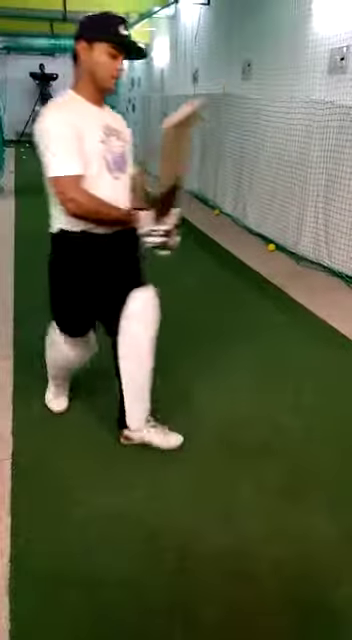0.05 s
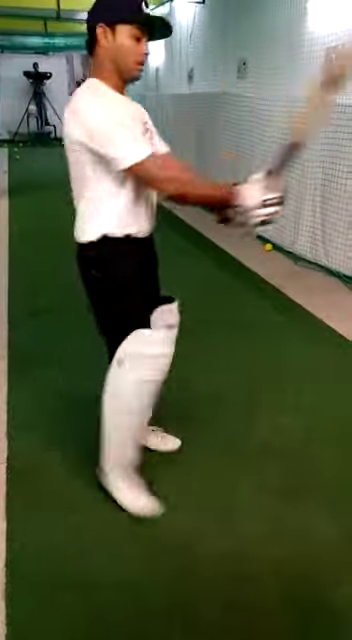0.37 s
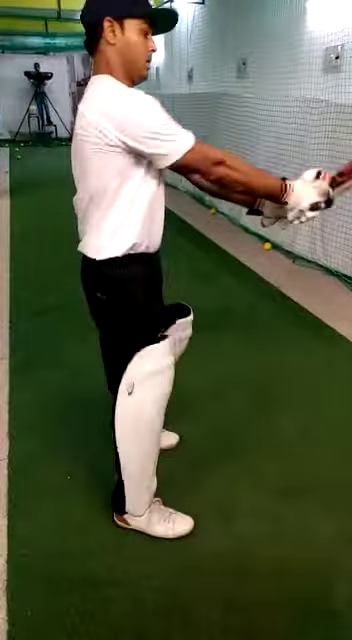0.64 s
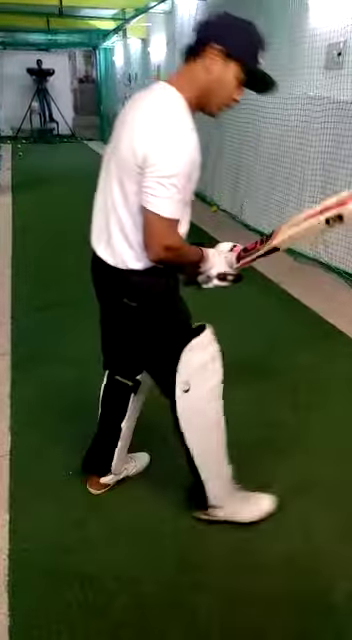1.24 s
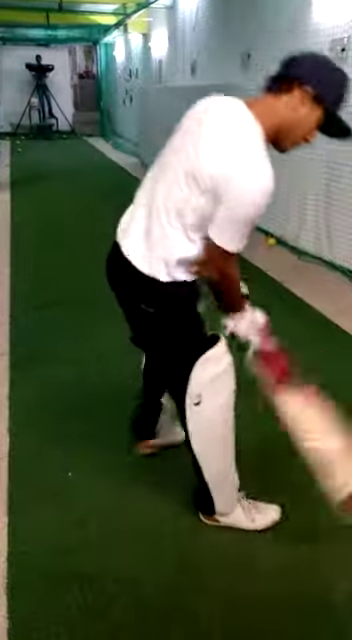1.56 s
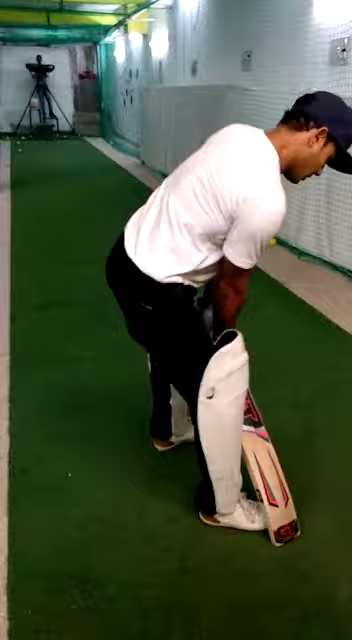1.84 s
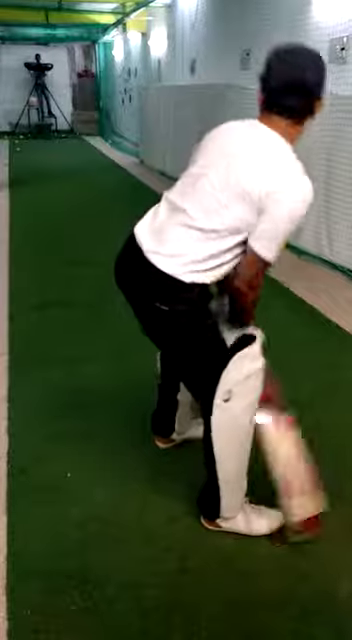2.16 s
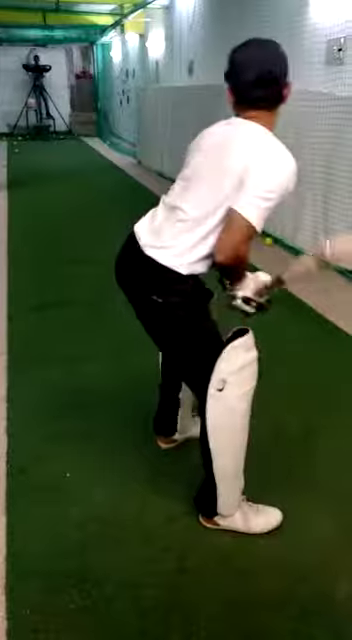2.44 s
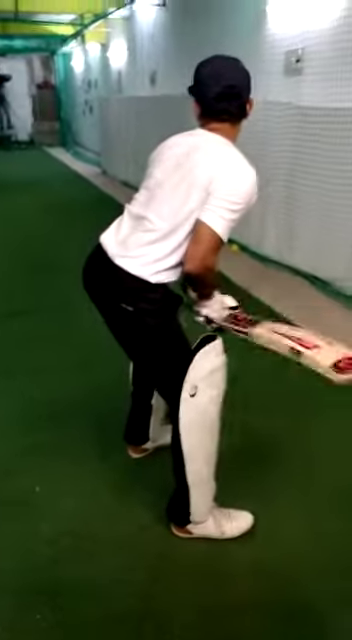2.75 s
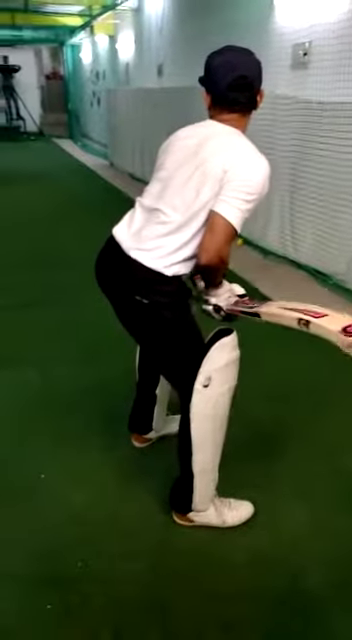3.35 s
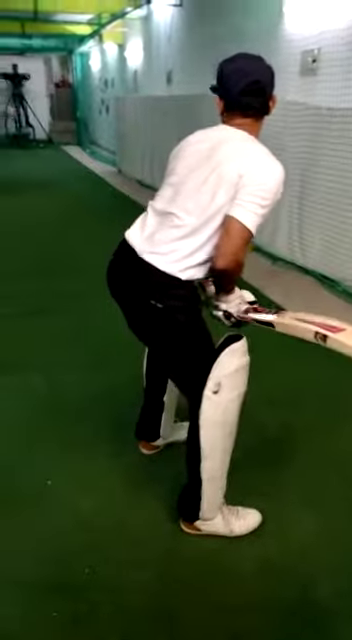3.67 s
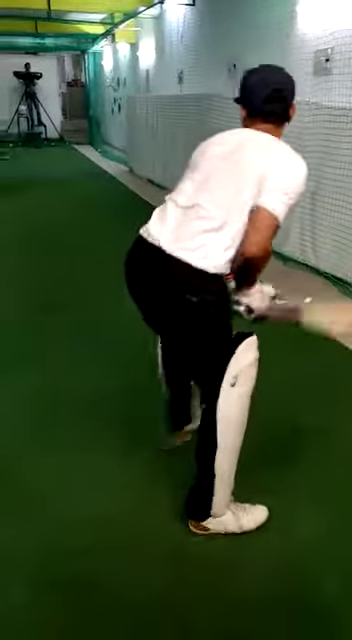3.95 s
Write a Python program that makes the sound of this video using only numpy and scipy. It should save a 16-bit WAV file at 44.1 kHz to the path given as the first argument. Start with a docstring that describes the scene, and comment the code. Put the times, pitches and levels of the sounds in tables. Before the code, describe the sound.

A fan hums steadily in an indoor cricket net, with faint shoe and pad scuffs during the first two seconds. At about 1.8 seconds a bat taps the turf with a woody, echoing thud. From 3.2 seconds a ball knocks and rolls down a distant bowling machine's chute. At 3.7 it fires with a brief squeal and a loud crack, followed by metallic rattling and a hollow boom.

```python
"""Indoor cricket net. A fan hums, shoes and pads scuff, and a faint squeak passes early on.
The batsman taps his bat: turf crunches, willow rings, the walls echo.
Far down the hall a ball knocks and rolls along a bowling machine's chute and squeals at the wheels.
They fire it with a bright crack; the machine rattles and rings, and a hollow boom fills the room."""
import sys
import numpy as np
from scipy import signal
from scipy.fft import rfft, irfft
from scipy.io import wavfile

SR = 44100
rng = np.random.default_rng(int(sys.argv[2]) if len(sys.argv) > 2 else 0)


def file_out(sig):
    """Save sig as 16-bit WAV at sys.argv[1]."""
    # one column per channel
    cols = np.atleast_2d(sig).T
    # limit, then scale
    lim = np.clip(cols, -1, 1)
    pcm = np.round(lim * 32767).astype(np.int16)
    wavfile.write(sys.argv[1], SR, pcm)


N = 176400
TIME = np.arange(N) / SR
FREQS = np.fft.rfftfreq(N, 1 / SR)
BAND_LIMIT_HZ = 15780


def amp(db):
    """Decibels to gain."""
    return 10 ** (np.asarray(db) / 20)


def lookup(table, hz, column=1):
    """Table column interpolated over log frequency."""
    columns = np.transpose(table)
    return np.interp(np.log(hz + 1), np.log(columns[0] + 1), columns[column])


def delayed(seconds):
    """Spectrum of a pure delay."""
    return np.exp(-2j * np.pi * FREQS * seconds)


def swell(middle, width):
    """Gaussian rise and fall; width is one sigma."""
    return np.exp(-.5 * ((TIME - middle) / width) ** 2)


def envelope(start, rise, t60):
    """Linear rise, exponential decay."""
    t = TIME - start
    return np.clip(t / rise, 0, 1) * amp(-60 * np.maximum(t - rise, 0) / t60)


def mode(start, hz, db, rise, t60):
    """One ringing resonance."""
    return amp(db) * envelope(start, rise, t60) * np.sin(2 * np.pi * hz * (TIME - start))


def flutter(shape, bandwidth_hz):
    """Low-passed random motion, unit variance."""
    motion = irfft(rfft(rng.standard_normal(shape)) * np.exp(-(FREQS / bandwidth_hz) ** 2), N)
    return motion / motion.std()


# hall left-right likeness: f/Hz, coherence/0-1
COHERENCE = [(60, 0.96), (160, .95), (300, 0.81), (550, 0.39), (1000, 0), (15000, 0.03)]
# microphone balance: f/Hz, left minus right/dB
BALANCE = [(100, 1), (500, 1.1), (2000, 0.5), (5000, -0.5), (8000, -2), (10500, -9), (14000, -4)]


def diffuse_spectrum():
    """Stereo noise as the microphones hear the hall, about unit power per Hz."""
    shared, separate = rfft(rng.standard_normal((2, N))) * np.sqrt(SR / 2)
    coherence = lookup(COHERENCE, FREQS)
    lean_db = lookup(BALANCE, FREQS) / 2
    right = coherence * shared + np.sqrt(1 - coherence ** 2) * separate
    return np.array([shared * amp(lean_db), right * amp(-lean_db)])


def tone(hz, db, depth, waver_hz):
    """Tone wavering in level and phase at each microphone."""
    waver = depth * flutter((2, 2, N), waver_hz)
    in_phase, quadrature = [pair + lookup(COHERENCE, hz) * (pair[0] - pair) for pair in waver]
    phase = 2 * np.pi * hz * TIME
    lean_db = lookup(BALANCE, hz) / 2
    wave = (1 + in_phase) * np.cos(phase) + quadrature * np.sin(phase)
    return amp(db) * amp([[lean_db], [-lean_db]]) * wave


def noise(spectrum):
    """Coloured hall noise."""
    return irfft(diffuse_spectrum() * amp(lookup(spectrum, FREQS)), N)


def reverberation(start, table, bands=20):
    """Dense reflections; each band has its own delay, rise and decay."""
    spectrum = diffuse_spectrum() * amp(lookup(table, FREQS))
    centres = np.geomspace(50, BAND_LIMIT_HZ, bands)
    tail = np.zeros((2, N))
    for hz, weights in zip(centres, np.eye(bands)):
        band = irfft(spectrum * np.interp(FREQS, centres, weights), N)
        delay, rise, t60 = (lookup(table, hz, column) for column in (2, 3, 4))
        tail += band * envelope(start + delay, rise, t60)
    return tail


# fan and room air: f/Hz, relative density/dB
AIR_SPECTRUM = [(30, -47), (45, -13), (58, -16), (74, -3.5), (92, -.5), (115, -6), (140, -6), (164, -12),
                (197, -6.5), (219, -13.5), (243, -12), (275, -17), (300, -14), (369, -20.5), (505, -18.5),
                (800, -23), (1140, -26), (1820, -34), (3200, -35.5), (4200, -42), (5600, -43), (7400, -42),
                (8800, -40.5), (10800, -44), (12500, -49), (15500, -58)]
# fan tones: f/Hz, level/dB
FAN_TONES = [(96.9, -45.5), (242.2, -54), (430.7, -55.5), (791.3, -57), (1281, -59.5)]
AIR_RMS_DB = -35
HUM_DEPTH, HUM_WAVER_HZ = 0.41, 2.04
DYING_HOLD_S, DYING_FADE_S = 0.27, 0.2


def fan():
    """Rushing air, wavering hum, one tone that dies away and a thin fluttering whine."""
    air = noise(AIR_SPECTRUM)
    hum = sum(tone(hz, db, HUM_DEPTH, HUM_WAVER_HZ) for hz, db in FAN_TONES)
    fade = np.exp(-np.maximum(TIME - DYING_HOLD_S, 0) / DYING_FADE_S)
    dying = tone(hz=1129.5, db=-53.5, depth=HUM_DEPTH, waver_hz=HUM_WAVER_HZ) * fade
    whine = tone(hz=15030, db=-81, depth=1.2, waver_hz=5)
    return amp(AIR_RMS_DB) * air / air.mean(0).std() + hum + dying + whine


# scuff strokes: t/s, width/s, gain/dB
SCUFF_STROKES = [(.07, 0.065, -7.5), (.55, 0.12, -11.5), (.95, 0.13, -10), (1.353, .0045, 2.5),
                 (1.372, 0.0093, -6), (1.43, 0.034, -7.5), (1.95, 0.046, -6.5), (2.04, 0.033, -8)]
# scuff friction: f/Hz, density/dB
SCUFF_SPECTRUM = [(300, -86), (2000, -86.5), (3200, -84), (4500, -85.5), (9000, -84.5), (12000, -89.5),
                  (15500, -97)]


def scuffs():
    """Shoes and pads brush softly as the batsman shuffles."""
    return noise(SCUFF_SPECTRUM) * sum(amp(db) * swell(t, width) for t, width, db in SCUFF_STROKES)


# squeak partials: middle t/s, length/s, top f/Hz, sag at ends/Hz, level/dB
SQUEAK_PARTIALS = [(.155, .13, 12300, 700, -65), (.165, .08, 15100, 700, -68)]


def squeak():
    """Thin whistle arching up and down in pitch and level."""
    whistle = np.zeros(N)
    for middle, length, top_hz, sag_hz, db in SQUEAK_PARTIALS:
        sag = np.minimum((2 * (TIME - middle) / length) ** 2, 1)
        phase = 2 * np.pi * np.cumsum(top_hz - sag_hz * sag) / SR
        whistle += amp(db) * np.sqrt(1 - sag) * np.sin(phase)
    return whistle


# blade contacts: t/s, gain/dB
CONTACTS = [(1.7597, 22), (1.7747, 6)]
# contact pulse: f/Hz, relative level/dB
BLOW_SPECTRUM = [(50, -49), (150, -20.5), (350, -1.5), (650, 4), (1050, 0), (1500, -11), (2200, -3.5),
                 (3000, -13), (4200, -36), (6000, -38), (10000, -27), (15000, -49)]
# wall echoes: delay/s, left/dB, right/dB
WALL_ECHOES = [(.0028, -11, -15), (.0106, -3, -21), (.0171, -8, -20), (.0283, -16, -14.5),
               (.032, -18.5, -19), (.098, -20, -18), (.124, -18, -20), (.154, -22, -21)]
RIGHT_LAG_S, ECHO_CUTOFF_HZ = 0.00013, 700


def bat_blow():
    """The blade lands and rocks once; the walls return dulled echoes."""
    log_gain = np.log(amp(lookup(BLOW_SPECTRUM, abs(np.fft.fftfreq(N, 1 / SR)))))
    pulse = np.exp(np.conj(signal.hilbert(log_gain)))[:len(FREQS)]  # minimum phase
    contacts = sum(amp(db) * delayed(t) for t, db in CONTACTS)
    direct = np.array([delayed(0), amp(-4) * delayed(RIGHT_LAG_S)])
    walls = sum(amp([[left], [right]]) * delayed(delay) for delay, left, right in WALL_ECHOES)
    walls /= 1 + 1j * FREQS / ECHO_CUTOFF_HZ
    return irfft(pulse * contacts * (direct + walls), N)


# turf fibres: f/Hz, density/dB
CRUNCH_SPECTRUM = [(1500, -80), (3000, -62), (4500, -72), (6500, -70), (11500, -74), (15500, -84)]
# bat and floor modes: f/Hz, level/dB, t60/s, left minus right/dB
BAT_MODES = [(257, -11, 0.085, 0), (304, -24, 0.47, 4), (417, -22, 0.37, 1), (483, -19.5, .09, 12),
             (597, -21.5, 0.24, 9), (665, -37, 0.6, 5), (1800, -34, .07, 0), (2220, -37, .07, 2),
             (3160, -27, 0.01, 9)]
# blade on turf: f/Hz, level/dB, rise/s, t60/s
THUD_MODES = [(135, -21, .003, 0.17), (204, -11.5, 0.014, 0.063)]
# hall after the tap: f/Hz, density/dB, delay/s, rise/s, t60/s
TAP_REVERB = [(60, -71.5, .005, .02, 0.94), (130, -47.5, .01, .03, 1.4), (252, -49.5, 0.018, .04, 1.73),
              (328, -48.5, 0.008, 0.019, 1.47), (576, -51, 0.0039, 0.0075, 1.28),
              (765, -62, .004, .008, 1.4), (995, -67.5, 0.0041, .008, 1.3),
              (2170, -68, 0.0036, 0.0056, 0.63), (4460, -80.5, 0.0018, 0.0038, 0.212),
              (9030, -82, 0.0022, 0.0035, 0.2), (15000, -97, .003, .004, .13)]
CRUNCH_RISE_S, BAT_RISE_S = 0.00042, 0.0013


def bat_tap():
    """The blow crushes the turf with a thud and sets willow, floor and hall ringing."""
    start = CONTACTS[0][0]
    crunch = noise(CRUNCH_SPECTRUM) * envelope(start - CRUNCH_RISE_S, CRUNCH_RISE_S, t60=.009)
    ring = sum(mode(start, hz, db, BAT_RISE_S, t60) * amp([[0], [-lean_db]])
               for hz, db, t60, lean_db in BAT_MODES)
    thud = sum(mode(start, *row) for row in THUD_MODES) * amp([[0], [-3.5]])
    return bat_blow() + crunch + ring + thud + reverberation(start, TAP_REVERB)


# ball against chute: t/s, f/Hz, level/dB
CHUTE_KNOCKS = [(3.232, 150.8, -18.5), (3.352, 188.4, -24), (3.43, 205, -31.5), (3.555, 160.5, -29),
                (3.66, 172.6, -28)]
# thin metallic rings: t/s, width/s, f/Hz, level/dB
CHUTE_RINGS = [(3.27, 0.017, 3110, -65), (3.36, 0.02, 2750, -60), (3.385, 0.021, 3100, -59),
               (3.52, 0.053, 2630, -60), (3.55, .13, 2600, -63), (3.65, 0.068, 3080, -57)]
# rolling rumble: f/Hz, density/dB
ROLL_SPECTRUM = [(50, -86), (100, -54), (150, -52.5), (210, -54.5), (300, -73.5), (800, -82), (3000, -110)]
# ball meeting the wheels: t/s, width/s, f/Hz, level/dB
WHEEL_SQUEALS = [(3.703, 0.0055, 5360, -54), (3.714, 0.011, 10600, -52), (3.728, .002, 5320, -39.5),
                 (3.733, 0.0046, 10620, -37)]
WAVER_DEPTH, RING_WAVER_HZ, SQUEAL_WAVER_HZ = 1.7, 45, 120


def chute():
    """The ball knocks and rolls down the chute, rings its metal and squeals at the wheels."""
    knocks = sum(mode(t, hz, db, rise=0.033, t60=0.16) for t, hz, db in CHUTE_KNOCKS)
    ring = sum(tone(hz, db, WAVER_DEPTH, RING_WAVER_HZ) * swell(t, width)
               for t, width, hz, db in CHUTE_RINGS)
    squeal = sum(tone(hz, db, WAVER_DEPTH, SQUEAL_WAVER_HZ) * swell(t, width)
                 for t, width, hz, db in WHEEL_SQUEALS)
    rumble = noise(ROLL_SPECTRUM) * envelope(start=3.3, rise=0.032, t60=5.7)
    return knocks + ring + squeal + rumble


# wheels gripping the ball: f/Hz, density/dB
SNATCH_SPECTRUM = [(1000, -92), (2000, -82), (3000, -69), (4300, -66), (7000, -70), (10500, -63.5),
                   (13000, -67), (15500, -70)]
# hollow modes of machine and hall: f/Hz, level/dB, delay/s, rise/s, t60/s
BOOM_MODES = [(157.2, -8, .02, 0.018, 0.27), (199.1, -8, .05, 0.096, 0.64), (262.5, -14.5, .06, 0.056, 0.9),
              (281.6, -20.5, .08, 0.036, 0.66), (333.8, -19, .05, 0.017, 0.605),
              (534, -25, .02, 0.023, 0.57), (615, -26, .025, .02, .4), (153.3, -11, .15, 0.032, 0.188),
              (212.8, -14, 0.219, 0.029, .5)]
# machine metal: f/Hz, level/dB, t60/s
METAL_MODES = [(990, -39.5, 1.9), (4040, -48, 0.83), (5320, -38, 0.71), (8250, -44.5, .7), (9696, -46, .6),
               (10800, -40, .5)]
# crack spreading through the hall: f/Hz, density/dB, delay/s, rise/s, t60/s
SHOT_REVERB = [(50, -74, .025, .02, 2), (85.7, -43, 0.026, .02, 1.94), (170, -39, 0.012, 0.0267, 7),
               (262, -37, 0.018, 0.065, 1.92), (394, -48.5, 0.0085, 0.0142, 3),
               (627, -51.5, 0.011, 0.021, 2.4), (1100, -56.5, 0.011, 0.02, 1.1),
               (1960, -65.5, 0.012, 0.026, 1.02), (3200, -66, 0.006, 0.027, 0.98),
               (5210, -63, 0.0015, 0.019, 0.73), (5860, -69.5, 0.0056, 0.014, 0.62),
               (8320, -65.5, 0.0018, 0.0143, 0.61), (10600, -65, 0.0011, .012, .6),
               (12500, -69.5, 0.0013, .012, 0.51), (15500, -77, 0, .012, 0.32)]
SHOT_S, SNATCH_S = 3.725, 3.739


def shot():
    """The wheels snatch the ball with a crack; metal rings, machine and hall boom."""
    snatch = noise(SNATCH_SPECTRUM) * swell(SNATCH_S, width=0.0058)
    boom = sum(mode(SHOT_S + delay, hz, db, rise, t60) for hz, db, delay, rise, t60 in BOOM_MODES)
    metal = sum(mode(SHOT_S, hz, db, rise=0.017, t60=t60) for hz, db, t60 in METAL_MODES)
    hall = reverberation(SHOT_S, SHOT_REVERB)
    return snatch + metal * amp([[-5], [0]]) + boom * amp([[0], [-1.3]]) + hall


# machine rattle: f/Hz, density/dB
RATTLE_SPECTRUM = [(1200, -92), (2700, -70), (5200, -68), (6200, -81), (15000, -84)]
GRIT_SIGMA_DB = 6


def rattle():
    """The machine shakes as the ball leaves: noise with a fast, uneven level."""
    grit = amp(GRIT_SIGMA_DB * flutter(N, bandwidth_hz=350))
    grit /= np.sqrt(np.mean(grit ** 2))
    return noise(RATTLE_SPECTRUM) * grit * envelope(SNATCH_S, rise=.006, t60=0.42)


# far-wall echo: f/Hz, density/dB
SLAP_SPECTRUM = [(300, -68), (700, -72), (1050, -52), (1600, -76), (2900, -68), (5200, -82), (7000, -87),
                 (15000, -92)]


def wall_slap():
    """The crack returns from the far wall as a short noise burst."""
    return noise(SLAP_SPECTRUM) * swell(middle=3.803, width=0.016)


def scene():
    """Stereo sum of fan, batsman and machine."""
    return fan() + scuffs() + squeak() + bat_tap() + chute() + shot() + rattle() + wall_slap()


CEILING, BASS_CUT_HZ = 0.7, 57


def record(dry):
    """Soft clip, bass cut, band limit."""
    rounded = dry / (1 + (dry / CEILING) ** 4) ** (1 / 4)
    highpass = signal.butter(5, BASS_CUT_HZ, "high", fs=SR, output="sos")
    lowpass = signal.firwin(511, BAND_LIMIT_HZ, window=("kaiser", 9), fs=SR)
    return signal.oaconvolve(signal.sosfilt(highpass, rounded), lowpass[None], "same")


dry = scene()
out = record(dry)
file_out(out)
```